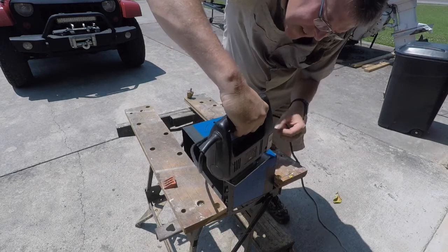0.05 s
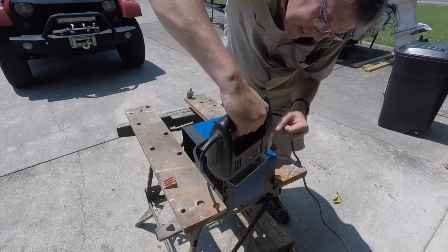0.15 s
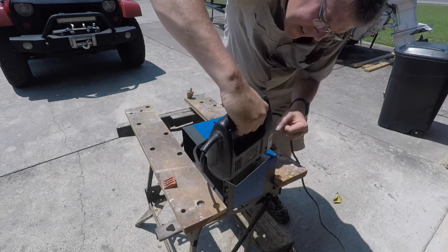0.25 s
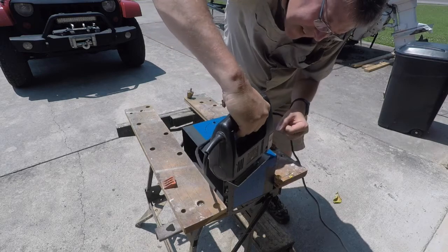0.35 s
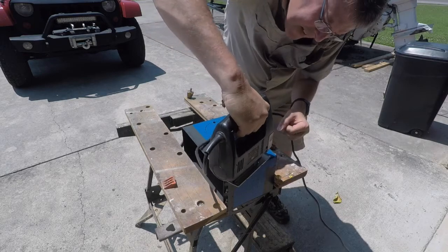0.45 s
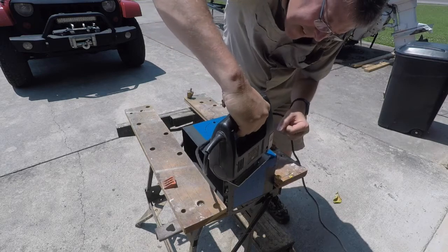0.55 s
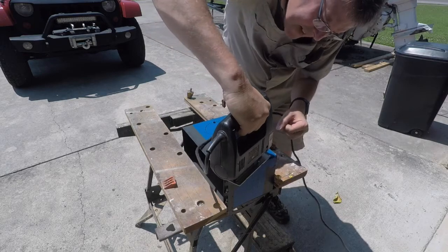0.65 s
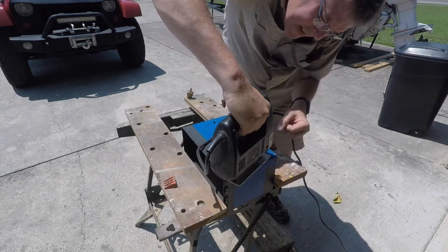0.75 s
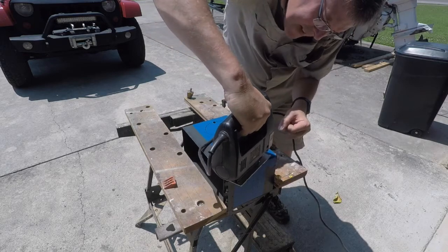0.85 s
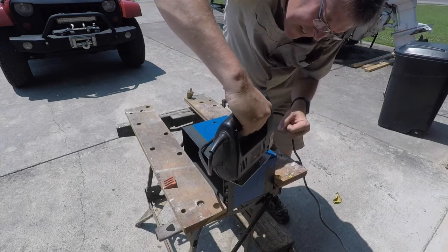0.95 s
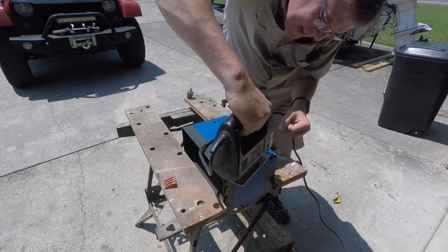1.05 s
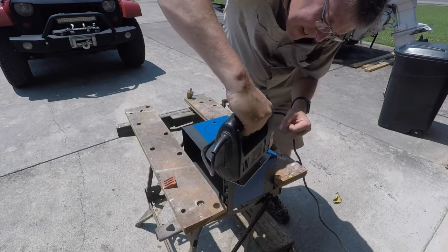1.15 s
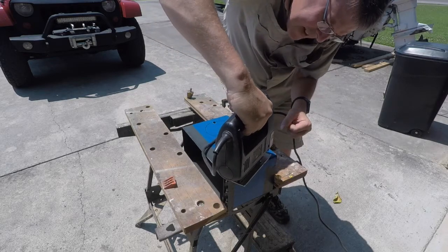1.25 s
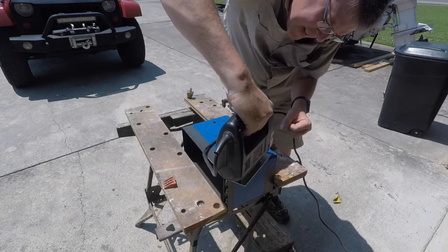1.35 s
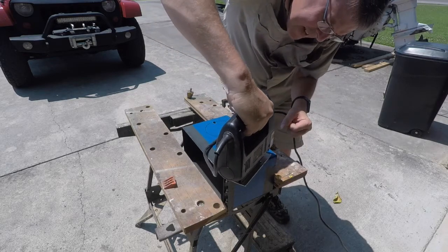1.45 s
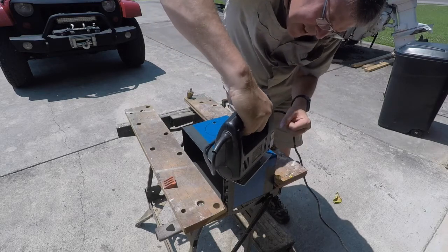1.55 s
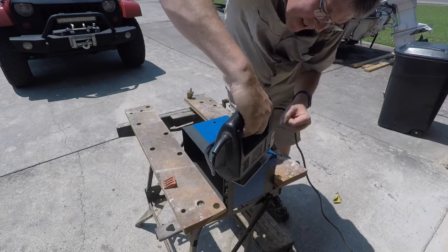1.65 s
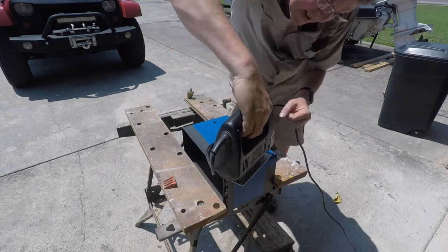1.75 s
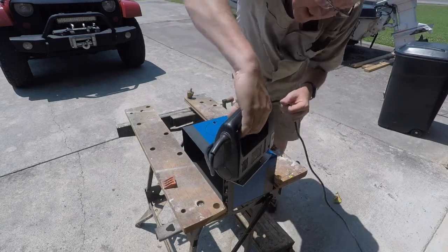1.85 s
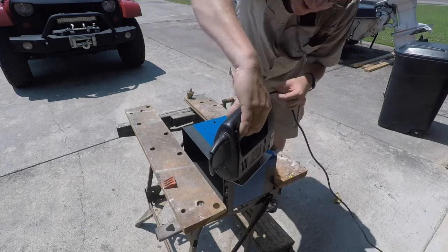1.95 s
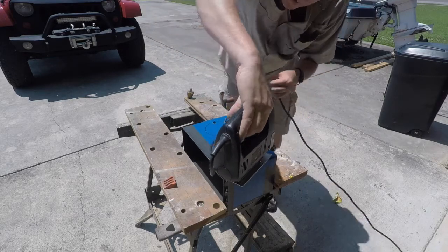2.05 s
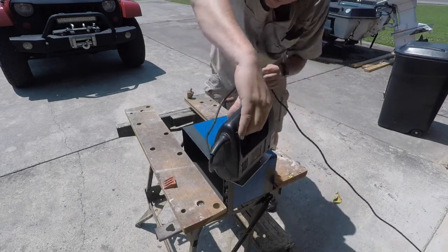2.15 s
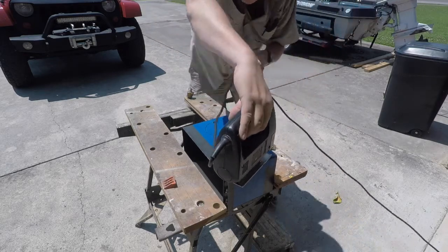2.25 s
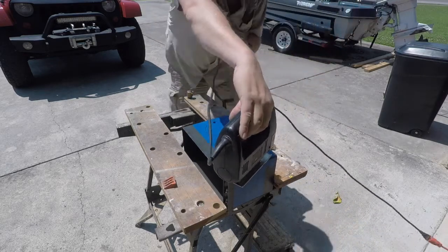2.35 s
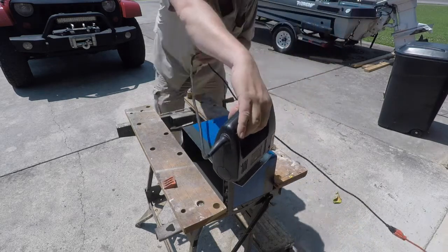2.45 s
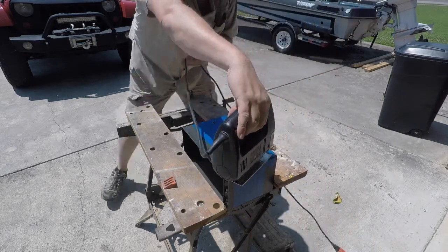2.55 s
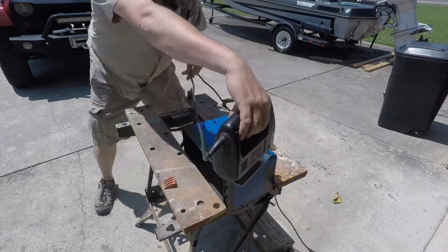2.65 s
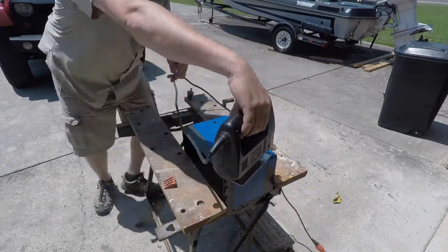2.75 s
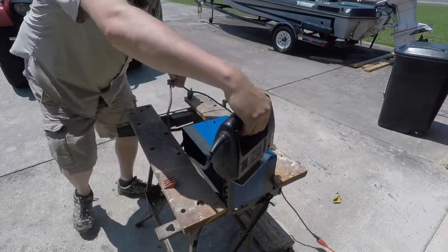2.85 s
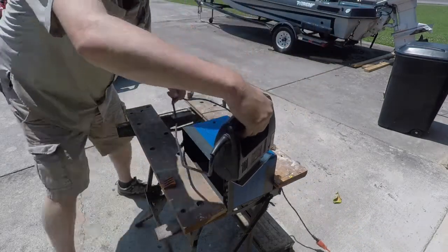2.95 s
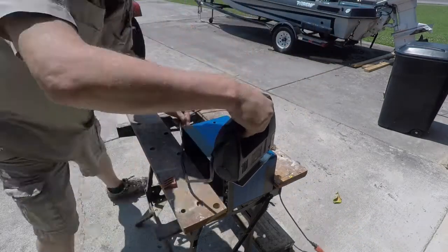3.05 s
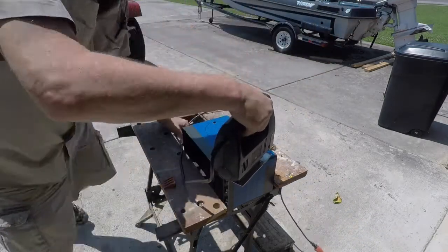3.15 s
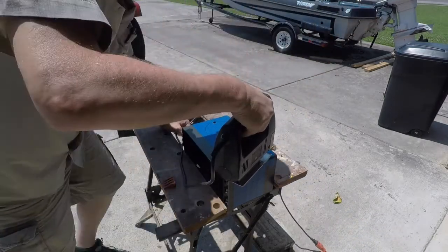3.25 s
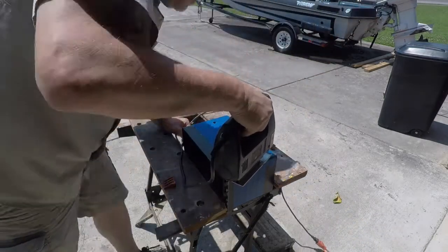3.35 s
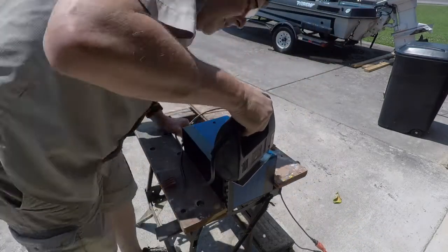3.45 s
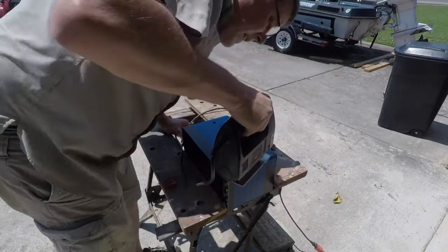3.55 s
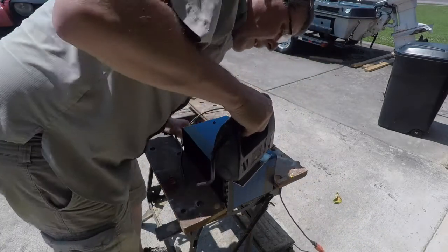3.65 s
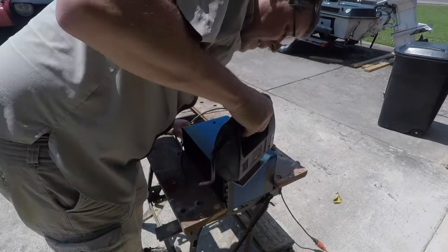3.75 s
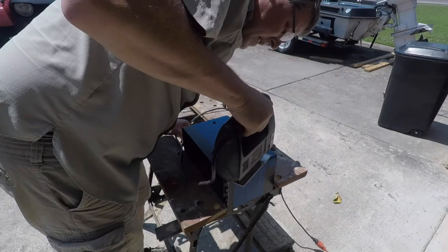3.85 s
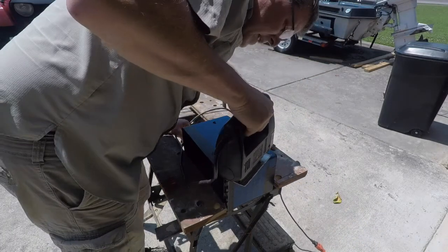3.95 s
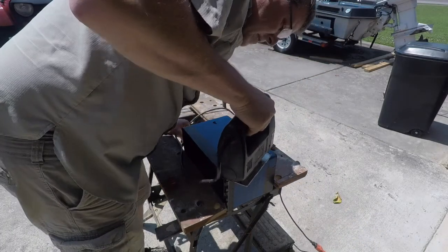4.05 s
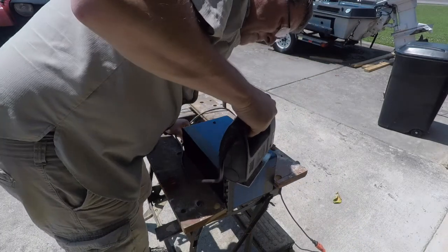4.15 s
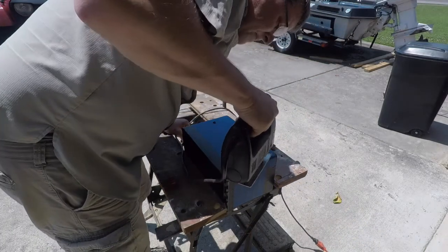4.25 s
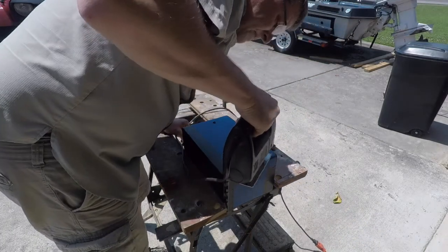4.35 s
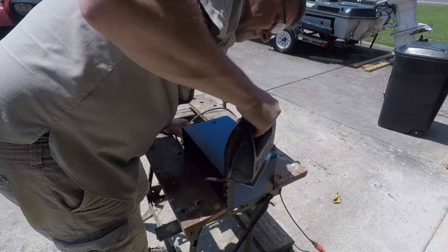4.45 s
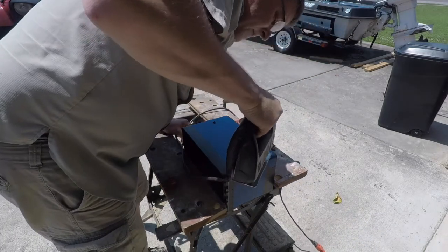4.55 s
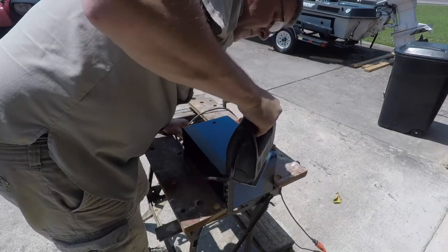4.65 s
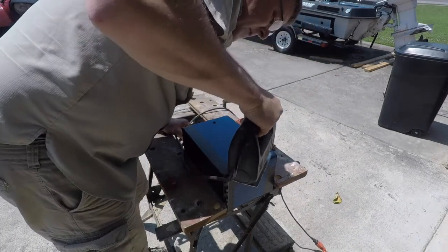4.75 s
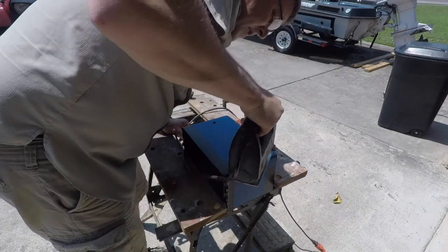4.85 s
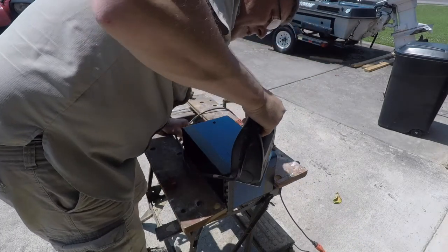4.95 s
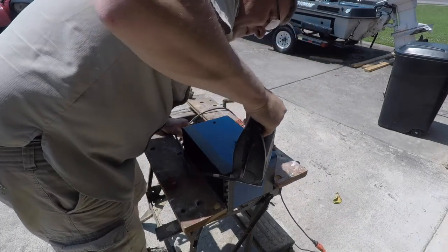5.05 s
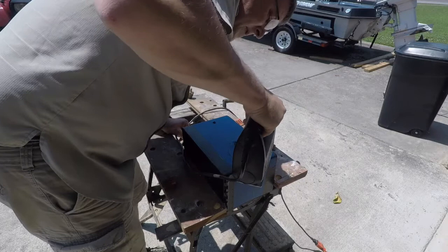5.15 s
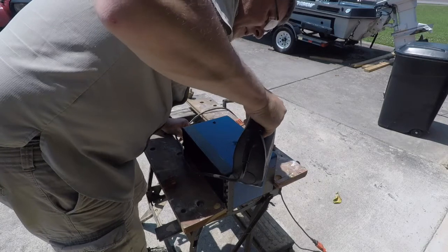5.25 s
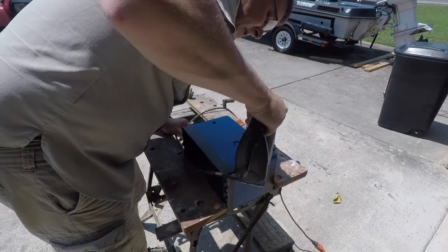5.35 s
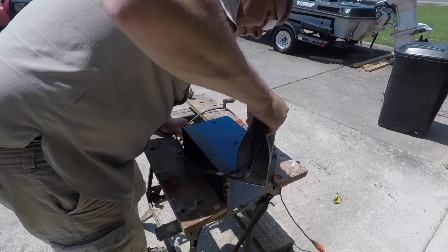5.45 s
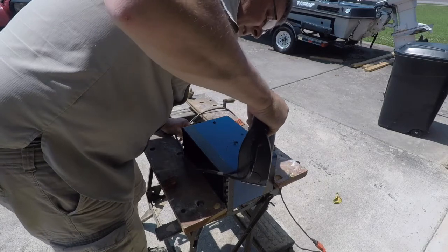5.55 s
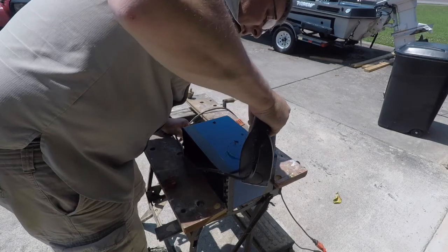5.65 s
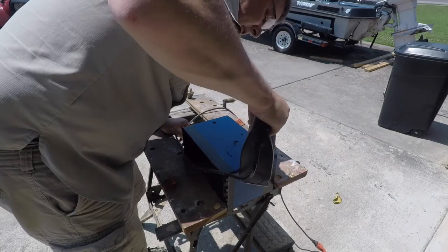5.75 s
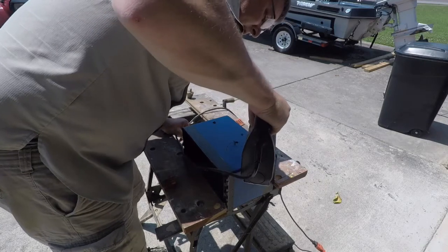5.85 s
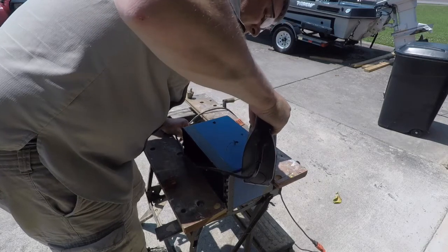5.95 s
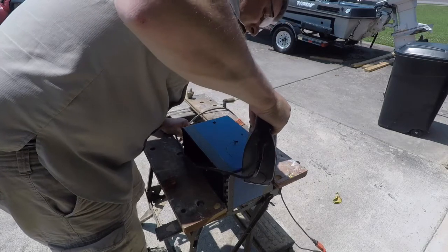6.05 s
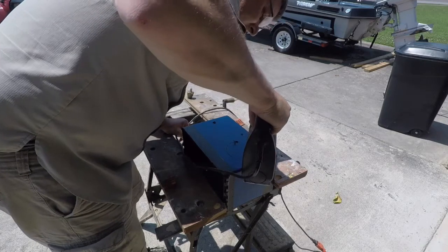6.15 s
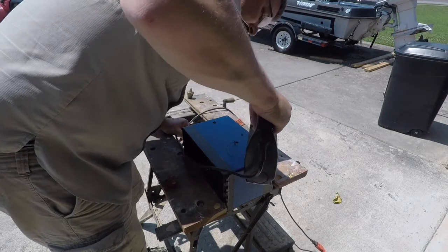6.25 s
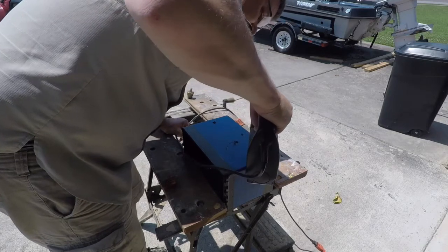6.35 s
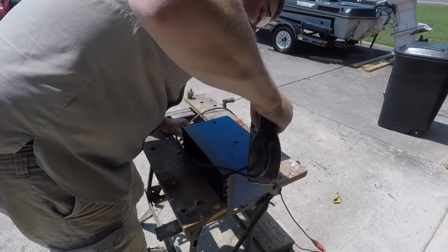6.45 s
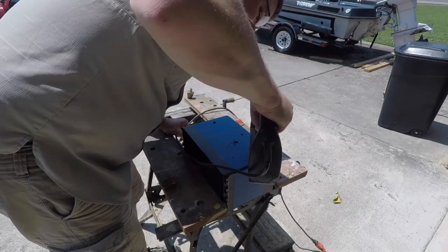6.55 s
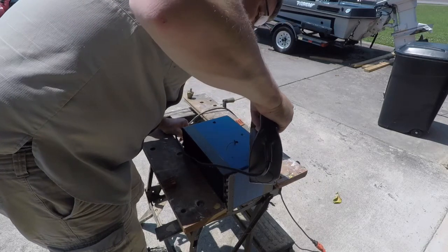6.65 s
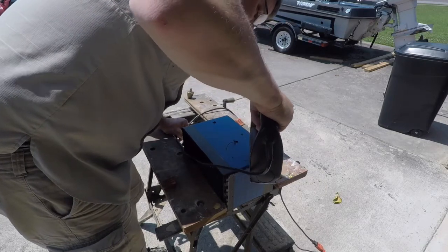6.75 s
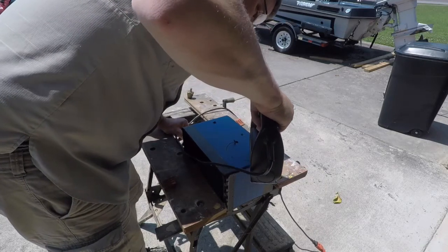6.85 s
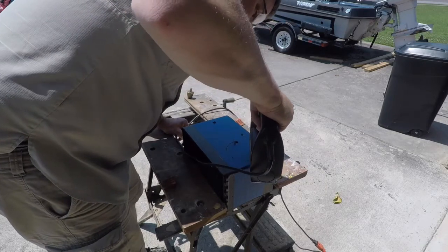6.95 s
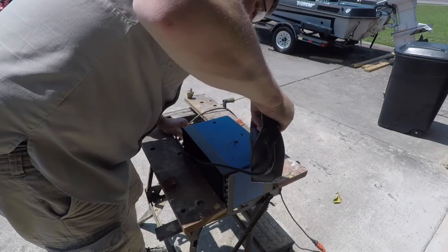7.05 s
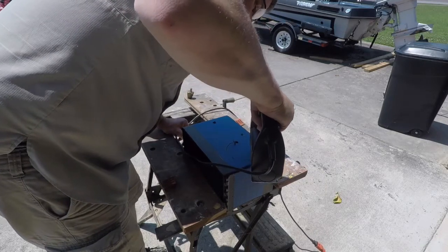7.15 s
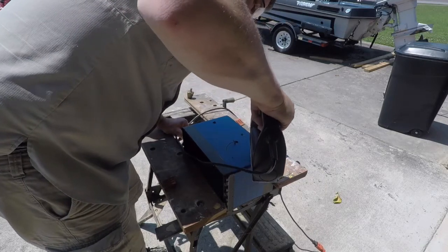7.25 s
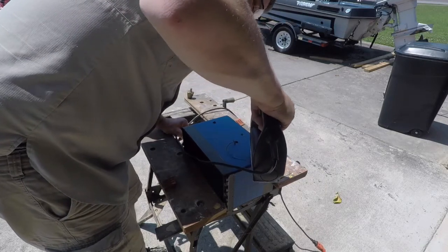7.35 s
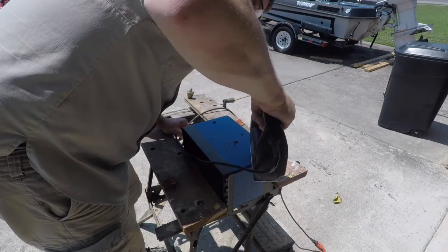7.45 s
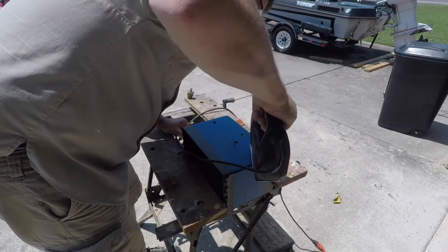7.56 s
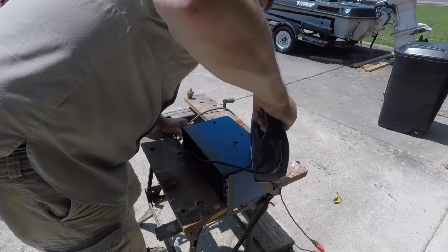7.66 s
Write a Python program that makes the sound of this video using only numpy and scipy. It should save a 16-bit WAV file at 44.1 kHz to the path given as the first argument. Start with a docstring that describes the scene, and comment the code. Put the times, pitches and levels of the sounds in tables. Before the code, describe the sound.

Outdoors and close to the microphone, a jigsaw hammers and rasps through ringing sheet steel over a low rumble. The blade slows, stutters and sticks. In the short pause come gritty shoe scuffs, a dragging cable, small knocks, and thin distant chirps against a soft hiss of traffic and leaves. The saw bites back in abruptly, rough at first, labouring briefly before settling into loud, continuous cutting.

```python
"""A jigsaw cuts a steel box clamped in a folding bench on a concrete drive.
Its teeth hammer the steel at about fifty strokes a second, so the box rings and the bench shakes.
The saw coasts to a stop, shoes and cable scuff and tap, faint birds chirp, then the saw bites again.
A low rumble fades in the pause and returns with the saw; far traffic and leaves lie behind it all."""
import sys
import numpy as np
from scipy import signal
from scipy.fft import rfft, irfft, next_fast_len
from scipy.io import wavfile
from scipy.ndimage import uniform_filter1d

SR = 44100
rng = np.random.default_rng(int(sys.argv[2]) if len(sys.argv) > 2 else 0)


def int16_out(signal):
    """Quantize to a 16-bit WAV file."""
    q = np.round(np.clip(np.atleast_2d(signal).T, -1, 1) * 32767)
    wavfile.write(sys.argv[1], SR, q.astype(np.int16))


N = 340011
TIME = np.arange(N) / SR
RELEASE_S, STUCK_S, PRESS_S = 1.6, 2.206, 3.816  # trigger let go, blade sticks, trigger pressed again

# The two cuts. Each row: levels of the low boom, middle ring and high rasp in dB, drift of ring and
# of rasp in dB a second, hum level in dB, bench shake in dB, unevenness of stroke pairs from 0 to 1.
CUTS = [(-22, -21, -19, 0.46, 0.26, -40.5, -33.5, 0.38), (-17, -22.5, -19, -0.48, 0.31, -32.5, -34, 0.15)]


def saw(stroke):
    """Repeating tooth blows and random chips ring the box; the cutting half of a stroke is louder."""
    rate, share = blade_speed()
    blows = teeth(stroke, count=200, jitter_s=3e-5, drift_strokes=26)
    chips = grains(per_s=14000, spread_db=1.5)
    force_db = 0.82 * np.cos(2 * np.pi * stroke) + .6 * wander(84) + 0.54 * wander(11)
    # Once the blade sticks, the blows die away and the box rings on.
    stuck_db = 324 * np.clip(TIME - STUCK_S, 0, 1) * (TIME < PRESS_S - .1)
    force = gain_of(force_db + bites_db(rate) - stuck_db)
    # Pushing harder or coasting shifts the balance of boom, ring and rasp.
    extra_speed, halvings = rate / share - 48, -np.log2(share)
    kick_db = 8 * after_restart(0.074)  # the jammed blade wrenches the box as it breaks free
    boom_change = -0.17 * extra_speed - 2 * halvings + kick_db
    ring_change = -0.16 * extra_speed - 11 * halvings
    rasp_change = 0.1447 * extra_speed - 10.5 * halvings
    chatter = after_restart(.6)  # the teeth run rough until the blade finds its groove
    chip_shares = [usual + (.95 - usual) * chatter for usual in (0.57, .45, 0.76)]  # boom, ring, rasp
    hum = panel_hum(stroke, rate) * (share > .99)
    out = np.zeros(N)
    for cut, (span, elapsed) in enumerate(zip(cut_spans(0.014), (TIME, TIME - PRESS_S))):
        boom_db, ring_db, rasp_db, ring_drift, rasp_drift, hum_db, _, _ = CUTS[cut]
        even = three_bands(colour(blows * force, lambda hz: steel_box(hz, cut)), 1150, 2200)
        rough = three_bands(colour(chips * force, lambda hz: steel_box(hz, cut)), 1150, 2200)
        boom, ring, rasp = (np.sqrt(1 - mix ** 2) * tooth + mix * chip
                            for tooth, chip, mix in zip(even, rough, chip_shares))
        out += span * (gain_of(boom_db + boom_change) * boom
                       + gain_of(ring_db + ring_change + ring_drift * elapsed) * ring
                       + gain_of(rasp_db + rasp_change + rasp_drift * elapsed) * rasp
                       + gain_of(hum_db) * hum)
    return out


def blade_speed():
    """Strokes a second, and the share of powered speed left while coasting or spinning up."""
    # Powered speed sags as the hand pushes harder. Each row: time in seconds, strokes a second.
    powered_speed = [(0, 50), (.35, 48.4), (.72, 47.6), (1.0, 50.2), (1.28, 53.3), (1.6, 52.9),
                     (4.06, 57.6), (4.25, 50.6), (4.55, 42.4), (4.65, 41.3), (4.88, 42.8), (5.05, 41.8),
                     (5.16, 43), (5.26, 50.3), (5.35, 50.2), (5.83, 45.5), (6.3, 50.1), (6.75, 47.6),
                     (7.04, 48.1), (7.17, 50.6), (7.35, 50.6), (7.71, 49.2)]
    coast_s, spin_up_s = .74, .05
    coasting = np.clip(1 - (TIME - RELEASE_S) / coast_s, .05, 1)  # friction slows the blade
    starting = 1 - .7 * np.exp(-np.clip(TIME - PRESS_S, 0, 1) / spin_up_s)
    share = np.where(TIME < PRESS_S, coasting, starting)
    return over_time(powered_speed) * share, share


def teeth(stroke, count, jitter_s, drift_strokes):
    """The same teeth strike at the same points of each stroke, while their strength slowly drifts."""
    place = np.arange(600)[:, None] + rng.random(count)  # counted in strokes
    strength = uniform_filter1d(rng.standard_normal(place.shape), drift_strokes, axis=0)
    hit_s = np.interp(place, stroke, TIME) + jitter_s * rng.standard_normal(place.shape)
    reached = place < stroke[-1]
    hit_samples = np.clip(hit_s[reached] * SR, 0, N - 1).astype(int)
    return unit_level(np.bincount(hit_samples, strength[reached], N))


def bites_db(rate):
    """A slowing or starting blade catches for about one stroke and lets go around each catch."""
    # Separate bites. Each row: start in seconds, lift in dB.
    bites = [(1.784, 2), (1.852, 2), (1.894, 5.5), (1.941, 6), (1.999, 7), (2.069, 8), (2.11, 0.5),
             (2.136, -0.5), (2.197, 8.5), (3.826, 22), (3.85, 1), (3.872, -2), (3.896, -1)]
    change_db = np.zeros(N)
    for start, lift_db in bites:
        strokes_since = np.clip(TIME - start, 0, 1) * np.interp(start, TIME, rate)
        catch = np.exp(-strokes_since) * (strokes_since > 0)
        let_go = 0.31 * (abs(TIME - start) < .04)
        change_db += lift_db * (catch - let_go)
    return change_db


def after_restart(fade_s):
    """Jumps to 1 when the trigger is pressed again, then fades."""
    return np.exp(-((TIME - PRESS_S) / fade_s) ** 2) * (TIME > PRESS_S)


def cut_spans(fade_s):
    """Two on-off curves: the first ends just before the restart, the second fades in from it."""
    return 1. * (TIME < PRESS_S - .1), np.clip((TIME - PRESS_S) / fade_s, 0, 1)


def steel_box(hz, cut):
    """How strongly the box answers each frequency; it is held differently in the two cuts."""
    # Its ringing notes. Each row: pitch in Hz, width in Hz, level in dB in cut one, and in cut two.
    notes = [(340.6, 8, -27, -15.5), (480.5, 20.6, 0, 0), (698, 32, 5.5, -0.5), (798, 33, 2, -1.5),
             (908, 38, 0.5, -7.5), (1180, 10, -5.5, -9.5), (1426, 45, 1, -15), (1495, 32, 0, 0),
             (1658, 9.6, -1.5, -11.5), (2427, 28, -13.5, -16), (2945, 98, -4.5, -7), (2950, 13, -2, -14),
             (3534, 104, -15, -12), (3880, 27, -8.5, -9), (4520, 87, -12.5, -12), (5790, 31, -14, -17),
             (6370, 36, -10, -11), (7395, 65, -12.5, -12), (8190, 170, -19, -15), (8530, 250, -19, -20.5),
             (11800, 57, -14, -28.5)]
    # The sheet's broad answer between the notes. Each row: frequency in Hz, level in dB.
    sheet = [(200, -50), (300, -69), (420, -13), (600, -8), (1100, -11), (1900, -18), (3200, -17),
             (5200, -19.5), (8000, -19), (10000, -22.5), (12500, -18.5), (15000, -25.5), (16500, -34)]
    note_power = sum(gain_of(levels[cut]) ** 2 / (1 + (2 * (hz - pitch) / width) ** 2)
                     for pitch, width, *levels in notes)
    bass_loss = np.sqrt(1 + (380 / (hz + 1)) ** 8)
    return np.sqrt(note_power + gain_of(at_hz(sheet, hz)) ** 2) / bass_loss


def panel_hum(stroke, rate):
    """A panel sings when 7 or 8 times the stroke rate crosses its own low note."""
    note_hz, width_hz = 335.6, 5.1
    hum = sum(np.sin(2 * np.pi * k * stroke) / (1 + (2 * (k * rate - note_hz) / width_hz) ** 2)
              for k in (7, 8))
    return hum * gain_of(2.0 * wander(3))


def bench_shake(stroke):
    """The bench drones at multiples of the stroke rate; strong-weak stroke pairs add tones between."""
    # How the bench passes on the shaking. Each row: frequency in Hz, relative level in dB.
    response = [(40, -33), (100, -9.5), (140, 0.5), (175, 6), (210, -7.5), (260, -7.5), (340, -36),
                (400, -21)]
    rate, share = blade_speed()
    # It shakes most when hard pushing slows the blade, and takes up the shake slowly.
    loss_db = 0.39 * np.clip(rate / share - 45.65, 0, 20) ** 2
    loss_db += 30 * np.clip(TIME - RELEASE_S, 0, 2) * (TIME < PRESS_S)
    lag = np.exp(-1 / (.12 * SR))
    loss_db = np.maximum(loss_db, signal.lfilter([1 - lag], [1, -lag], loss_db))
    side_phase = np.array([[0], [1.1]])  # radians: left and right get the shake out of step
    out = np.zeros((2, N))
    for (*_, shake_db, unevenness), span in zip(CUTS, cut_spans(.1)):
        tones = np.zeros((2, N))
        for k in range(2, 16):  # steps of half the stroke rate
            level = gain_of(at_hz(response, k / 2 * rate) + 3.1 * wander(2.8))
            phase = np.pi * k * stroke + 2 * np.pi * rng.random() + side_phase
            tones += (unevenness if k % 2 else 1) * level * np.sin(phase)
        buzz = np.array([shaped_noise(response, top_hz=420) for _ in range(2)])
        steady = tones / np.sqrt(uniform_filter1d(tones ** 2, 12000) + 1e-9)
        out += span * gain_of(shake_db - loss_db) * (steady + 0.36 * buzz)
    return out * gain_of([[-3], [4]])  # louder on the right


def scuffs():
    """Shoes and cable drag over concrete: dense clicks of grit swell and die away."""
    # Each row: loudest moment, rise time and fall time in seconds, level in dB,
    # brightness in dB per octave, scrape pitch in Hz.
    drags = [(2.32, .008, 0.014, -44.5, 4, 4000), (2.42, 0.0093, .035, -42.5, 2.5, 2000),
             (2.46, .008, .015, -45, -3, 1500), (2.51, .015, 0.042, -51, 2, 9000),
             (2.565, .005, 0.032, -43, -2, 6800), (2.632, .004, 0.025, -39, 3, 1500),
             (2.68, .006, .03, -40, -0.5, 2000), (2.718, 0.022, .022, -36, 0, 2000),
             (2.795, 0.024, 0.018, -25.5, 2.5, 4970), (2.85, .02, 0.03, -42, 0, 800),
             (3.07, 0.033, .03, -39, -0.5, 900), (3.135, 0.0079, 0.038, -43, -3, 3000),
             (3.38, .015, 0.018, -46, 2, 8000), (3.49, .01, .015, -50, 1, 6000),
             (3.626, 0.0066, 0.017, -36.5, 0.5, 4000), (3.75, .011, .015, -46, -4, 3000)]
    # The tone of the grit. Each row: frequency in Hz, relative level in dB.
    grit_tone = [(150, -55), (250, -15.5), (342, -6), (519, -4), (557, -4), (618, -2), (2810, -8.5),
                 (3280, -10.5), (13000, -17), (16000, -19)]
    grit = grains(per_s=9000, spread_db=1.2) * gain_of(2.0 * wander(74))
    out = np.zeros(N)
    for crest, rise, fall, db, tilt_db, scrape_hz in drags:
        def drag_tone(hz):
            hump_db = 4 * np.exp(-(np.log2((hz + 1) / scrape_hz) / .5) ** 2)
            return gain_of(at_hz(grit_tone, hz) + tilt_db * np.log2((hz + 200) / 4000) + hump_db)
        part = slice(round((crest - .15) * SR), round((crest + .2) * SR))
        t = TIME[part] - crest
        swell = np.exp(-np.where(t < 0, -t / rise, t / fall) ** 1.24)
        out[part] += gain_of(db) * unit_level(colour(grit[part], drag_tone)) * swell
    return out


def taps():
    """Cable, bench and switch tap: each tap is a noisy tick with a short low knock."""
    # Each row: start in seconds, relative tick level in dB, tick pitch in Hz,
    # knock level in dB, knock pitch in Hz.
    hits = [(2.3875, -32, 11900, -44, 344), (2.409, -27, 1770, -37, 520), (2.4497, -31, 1770, -33, 476),
            (2.5286, -30, 13200, -41, 347), (2.56, -32, 6700, -43.5, 334), (2.5885, -30, 1550, -38, 347),
            (2.6268, -24, 1560, -34, 460), (2.6724, -30, 1730, -40, 471), (2.9334, -42, 1510, -29.5, 710),
            (3.005, -38, 1500, -32, 434), (3.0344, -34, 2780, -33, 634), (3.126, -29, 3260, -43.5, 340),
            (3.344, -36, 1590, -47, 306), (3.3717, -37, 1530, -41, 520), (3.451, -41, 1670, -34, 690),
            (3.6174, -28, 4650, -31, 543), (3.6256, -26, 4620, -30, 515), (3.722, -45, 5210, -35.5, 466),
            (3.749, -37, 1660, -46, 320)]
    out, t = np.zeros(N), np.arange(2000) / SR
    for start, tick_db, tick_hz, knock_db, knock_hz in hits:
        noise = rng.standard_normal(len(t))
        hiss = unit_level(colour(noise, lambda hz: 1 / (0.74 + np.log2((hz + 1) / tick_hz) ** 2)))
        tick = .5 * gain_of(tick_db) * hiss * (np.exp(-t / 0.003) + .6 * np.exp(-t / 0.00053))
        knock_fade = np.exp(-t / 0.0031) + 0.33 * np.exp(-t / 0.021)
        knock = gain_of(knock_db) * np.sin(2 * np.pi * knock_hz * t) * knock_fade
        out[round(start * SR):][:len(t)] += (tick + knock) * np.minimum(t / 0.00065, 1)
    return out


def birds():
    """Distant birds give thin, slightly rough whistles that slide up to their pitch and fade."""
    # Each row: start in seconds, length in seconds, pitch in Hz, level in dB.
    chirps = [(2.89, .05, 6900, -58), (2.965, .045, 7200, -58), (3.175, .045, 5250, -53),
              (3.235, .09, 7130, -53), (3.35, .025, 5250, -60), (3.406, .045, 7480, -55)]
    waver, out = 1 + .006 * wander(150), np.zeros(N)
    for start, length, hz, db in chirps:
        t = np.clip(TIME - start, 0, length)
        pitch = hz * (1 - .18 * np.exp(-t / .007)) * waver
        swell = np.sqrt(abs(np.sin(np.pi * t / length))) * (t < length)
        out += swell * gain_of(db - 6 * t / length) * np.sin(2 * np.pi * np.cumsum(pitch) / SR)
    return out


def low_rumble():
    """A lumpy low rumble, alike on both sides in the deep bass and less so higher up."""
    # It fades in the pause and returns with the saw. Each row: time in seconds, level in dB.
    levels = [(0.0, -46.5), (2.3, -52), (3.7, -67), (4.05, -72), (4.44, -53), (5.2, -47), (7.71, -44.5)]
    # Its tone. Each row: frequency in Hz, relative level in dB.
    tone = [(15, -6), (40, -4.5), (90, -3), (160, -10.5), (240, -11), (300, -37)]
    shared, other = (shaped_noise(tone, top_hz=320) * gain_of(1.7 * wander(5)) for _ in range(2))
    right_only = signal.sosfilt(signal.butter(2, 50, "high", fs=SR, output="sos"), other)
    sides = np.array([gain_of(0.5) * shared, gain_of(-1.0) * shared + right_only])
    return gain_of(over_time(levels)) * sides


def traffic_and_leaves():
    """Far traffic and leaves blend into a soft, wavering hiss."""
    # Each row: frequency in Hz, relative level in dB.
    tone = [(120, -61), (200, -40), (299, -3), (353, -8), (1320, -25), (5730, -33), (7140, -30),
            (7680, -37), (12500, -33), (16000, -34)]
    return gain_of(-48 + 1.4 * wander(9)) * shaped_noise(tone)


def stereo_width(sound):
    """Left and right are nearly alike, wider in the upper middle and the top treble."""
    # Each row: frequency in Hz, how alike left and right are from 0 to 1.
    likeness = [(240, 0.79), (400, .99), (1200, 1), (1800, 0.75), (4300, 0.8), (4800, 0.91), (5700, 1),
                (9700, 1), (10000, .82), (14000, .6), (15000, 0.28)]
    # Each row: frequency in Hz, how far left runs ahead of right in radians.
    left_lead = [(300, -0.18), (1400, -0.052), (3000, .45), (4300, 0.44), (4900, 0), (16000, 0)]
    # Each row: frequency in Hz, left level minus right level in dB.
    balance = [(240, 0.5), (1200, 0), (1900, -4), (2800, -2.5), (4400, 0), (11500, 0), (15500, -1.5)]
    size = next_fast_len(N + 8192)
    hz = np.fft.rfftfreq(size, 1 / SR)
    echoes = rng.standard_normal(8000) * np.exp(-np.arange(8000) / SR / .035)
    angle = np.arccos(np.clip(at_hz(likeness, hz), -1, 1)) / 2
    shared = np.cos(angle)
    apart = np.sin(angle) * rfft(echoes / np.linalg.norm(echoes), size)
    to_left = np.exp(.5j * at_hz(left_lead, hz)) * gain_of(at_hz(balance, hz) / 2)
    sides = np.array([(shared + apart) * to_left, (shared - apart) / to_left])
    return irfft(rfft(sound, size) * sides, size)[:, :N]


def gain_of(db):
    """Turns decibels into a number to multiply by."""
    return 10 ** (np.asarray(db) / 20)


def unit_level(x):
    """Scales a signal to an average power of 1."""
    return x / np.sqrt(np.mean(x ** 2) + 1e-20)


def at_hz(points, hz):
    """Reads between the rows of a frequency table, with octaves about evenly spaced."""
    frequencies, values = np.transpose(points)
    return np.interp(np.log(hz + 1), np.log(frequencies + 1), values)


def over_time(points):
    """Reads a table of times and values at every sample."""
    return np.interp(TIME, *np.transpose(points))


def colour(x, gain):
    """Filters x by gain(hz), so that ringing comes after each hit and never before it."""
    log_gain = np.log(np.maximum(gain(abs(np.fft.fftfreq(16384, 1 / SR))), 1e-5))
    ringing = np.fft.ifft(np.exp(np.conj(signal.hilbert(log_gain)))).real[:6000]
    return signal.oaconvolve(x, ringing)[:len(x)]


def shaped_noise(tone, top_hz=np.inf):
    """Noise shaped by a frequency table and turned down 60 dB above top_hz."""
    noise = rng.standard_normal(N)
    return unit_level(colour(noise, lambda hz: gain_of(at_hz(tone, hz) - 60 * (hz > top_hz))))


def three_bands(x, low_hz, high_hz):
    """Splits a sound into low, middle and high parts of equal power."""
    low, below_high = (signal.sosfiltfilt(signal.butter(4, hz, fs=SR, output="sos"), x)
                       for hz in (low_hz, high_hz))
    return unit_level(low), unit_level(below_high - low), unit_level(x - below_high)


def wander(hz):
    """A smooth random curve that moves mostly slower than hz."""
    smoothed = uniform_filter1d(rng.standard_normal(N), int(SR / hz / 4) + 1)
    return unit_level(signal.lfilter([1], [1, -np.exp(-2 * np.pi * hz / SR)], smoothed))


def grains(per_s, spread_db):
    """Clicks at random moments, a few of them larger."""
    size = gain_of(spread_db * np.minimum(rng.exponential(1, N), 5)) * rng.choice([-1., 1.], N)
    return unit_level(size * (rng.random(N) < per_s / SR))


def scene():
    """All the sounds together, left and right."""
    rate, _ = blade_speed()
    stroke = np.cumsum(rate) / SR  # strokes made so far
    sound = saw(stroke) + scuffs() + taps() + birds() + traffic_and_leaves()
    return stereo_width(sound) + bench_shake(stroke) + low_rumble()


def record(dry):
    """Quickly turns down loud passages, caps the peaks and removes the highest treble."""
    power_db = 10 * np.log10(abs(uniform_filter1d((dry ** 2).mean(0), 300)) + 1e-12)
    over_db = uniform_filter1d(np.maximum(power_db + 15, 0), 300)
    limited = np.clip(dry / gain_of(0.33 * over_db), -1, 1)
    treble_cut = signal.firwin(511, 15950, window=("kaiser", 9), fs=SR)
    return signal.oaconvolve(limited, treble_cut[None], "same")


dry = scene()
out = record(dry)
int16_out(out)
```